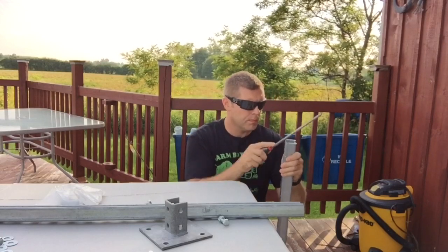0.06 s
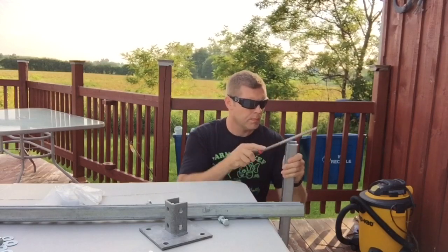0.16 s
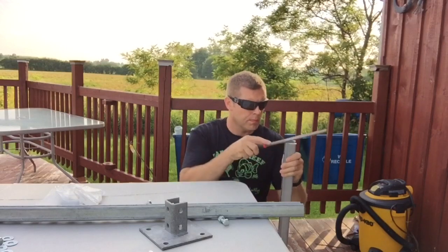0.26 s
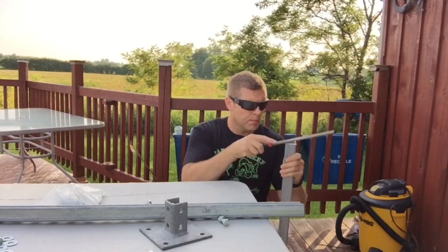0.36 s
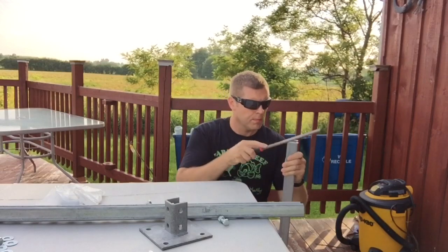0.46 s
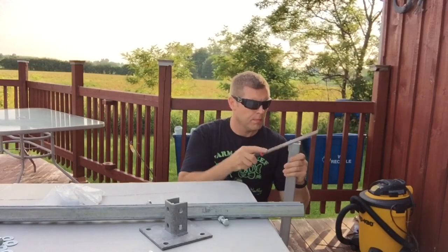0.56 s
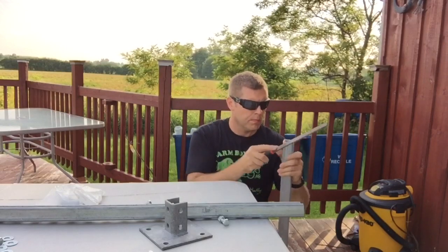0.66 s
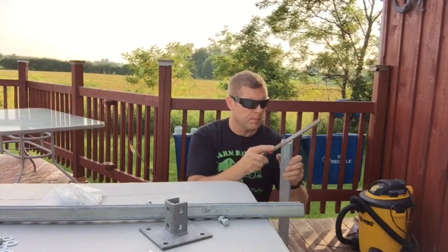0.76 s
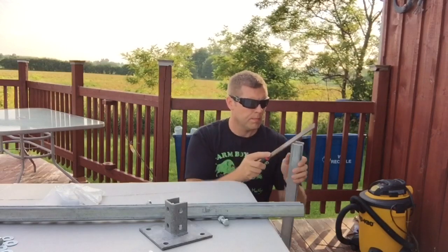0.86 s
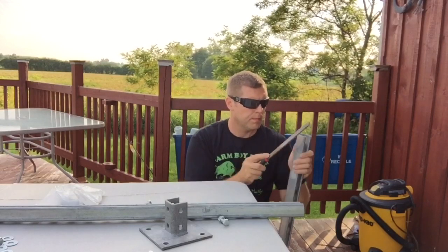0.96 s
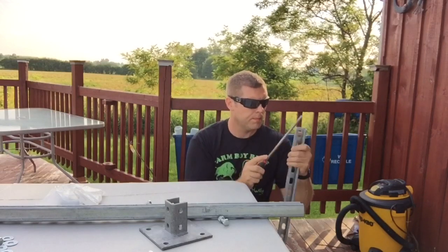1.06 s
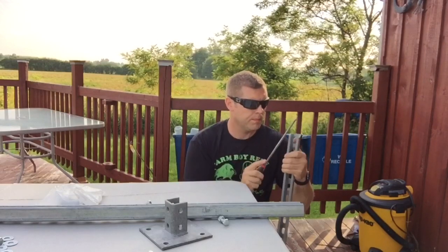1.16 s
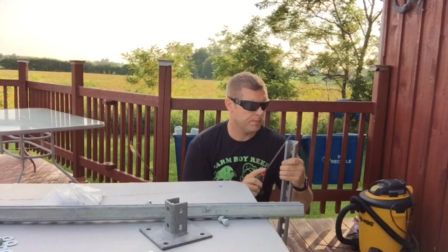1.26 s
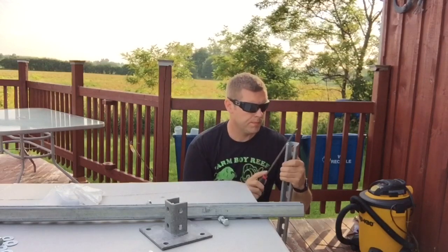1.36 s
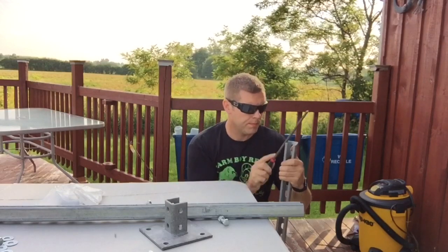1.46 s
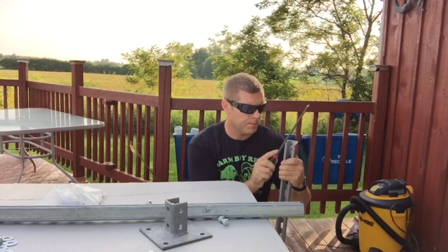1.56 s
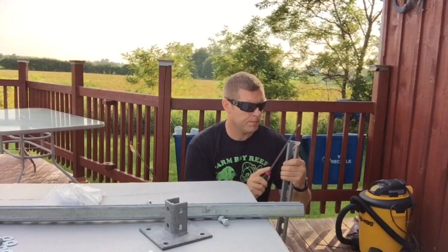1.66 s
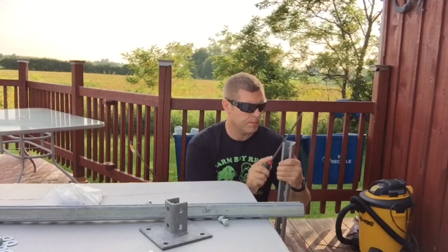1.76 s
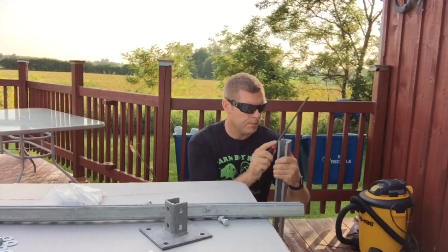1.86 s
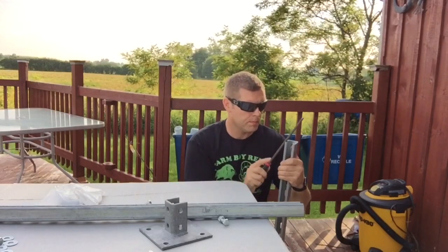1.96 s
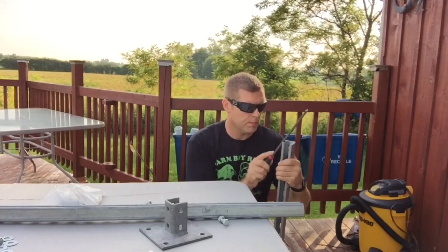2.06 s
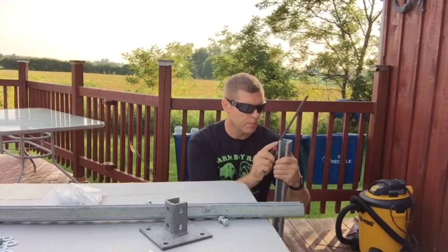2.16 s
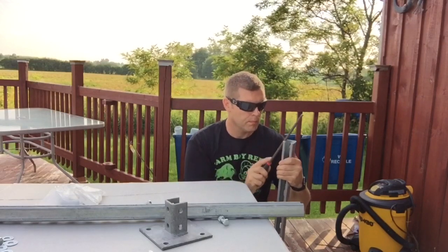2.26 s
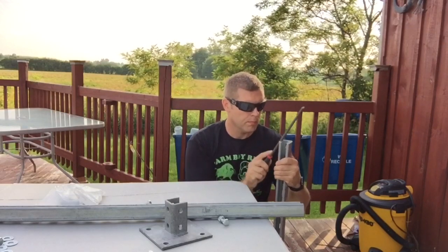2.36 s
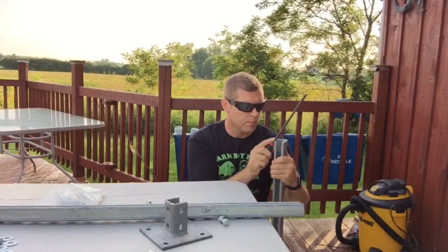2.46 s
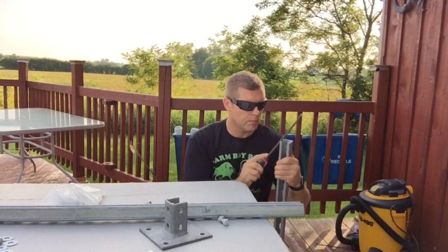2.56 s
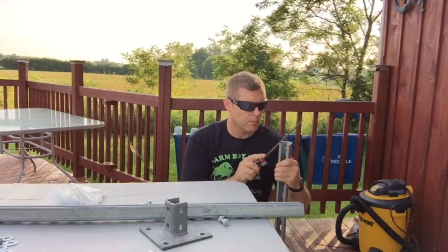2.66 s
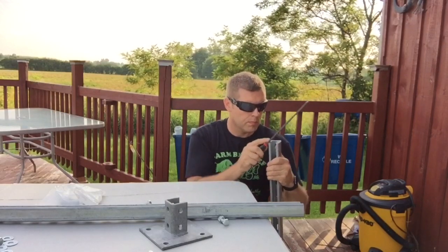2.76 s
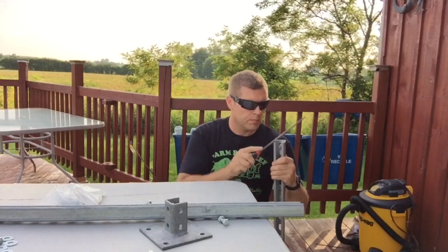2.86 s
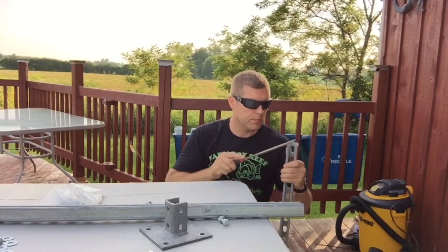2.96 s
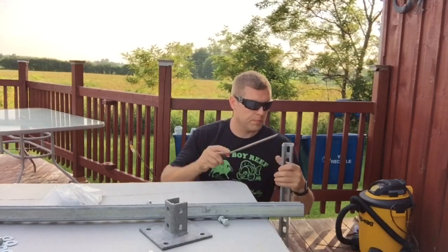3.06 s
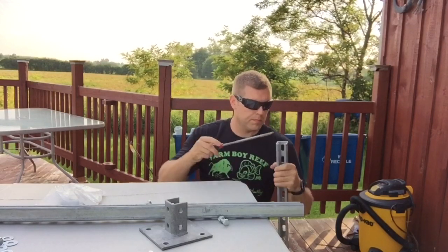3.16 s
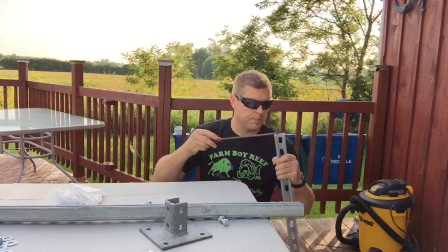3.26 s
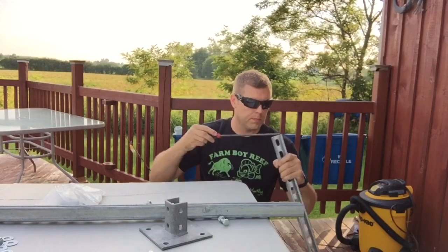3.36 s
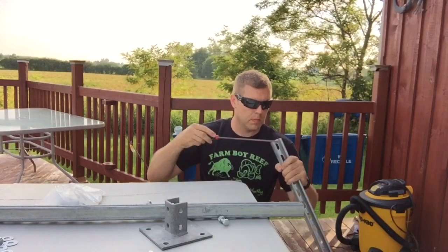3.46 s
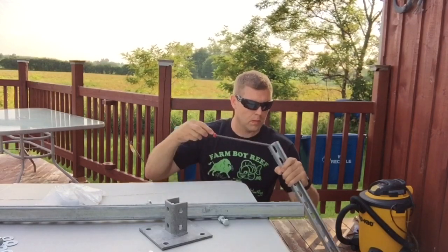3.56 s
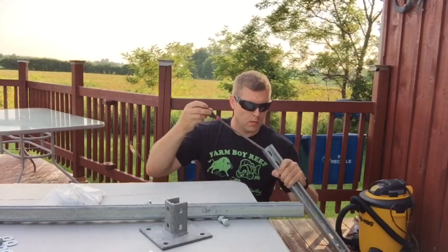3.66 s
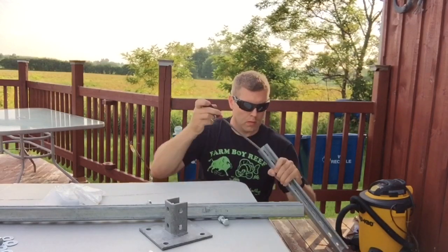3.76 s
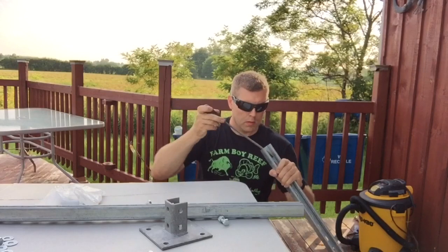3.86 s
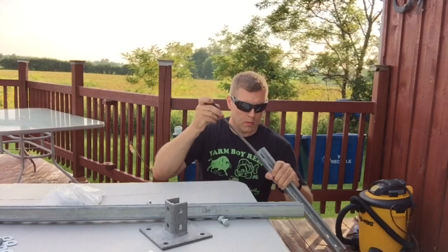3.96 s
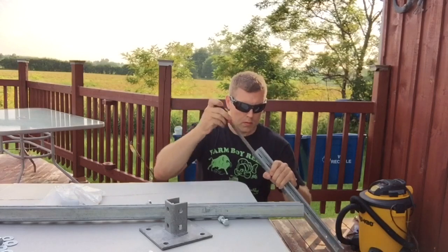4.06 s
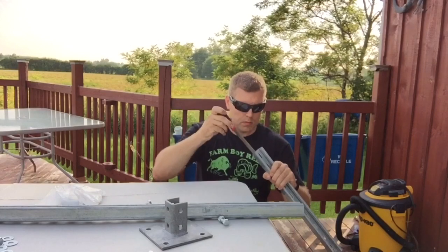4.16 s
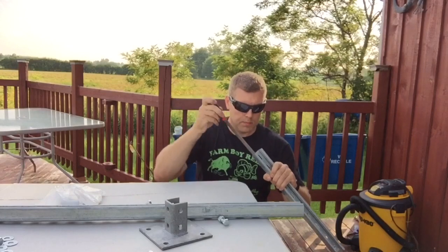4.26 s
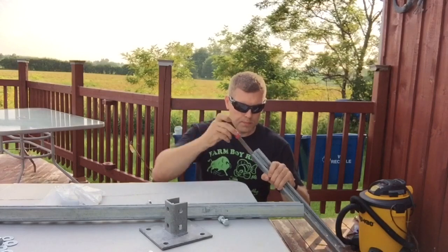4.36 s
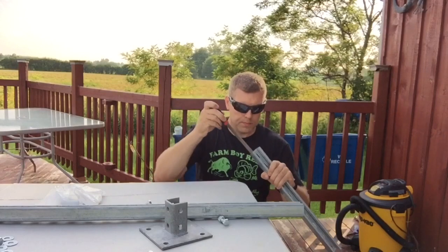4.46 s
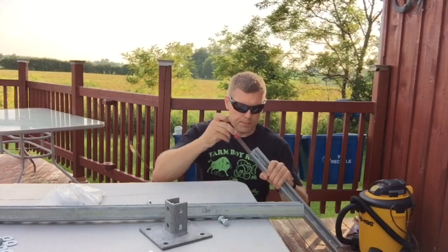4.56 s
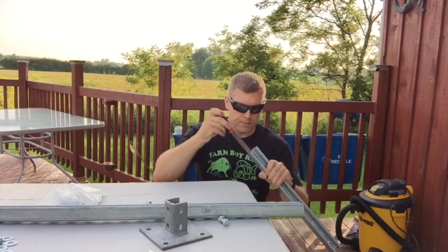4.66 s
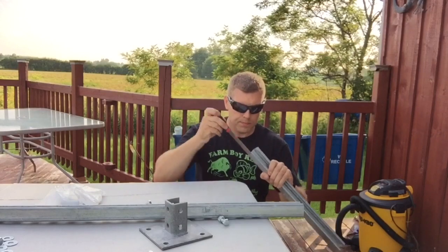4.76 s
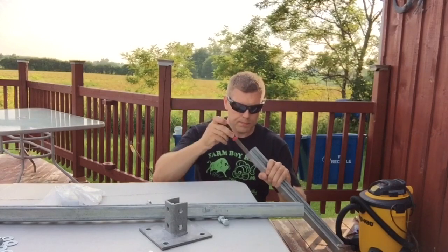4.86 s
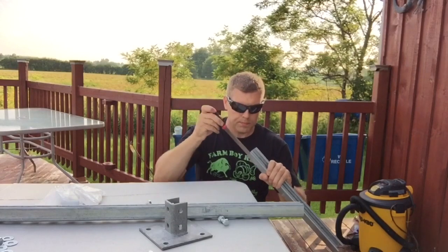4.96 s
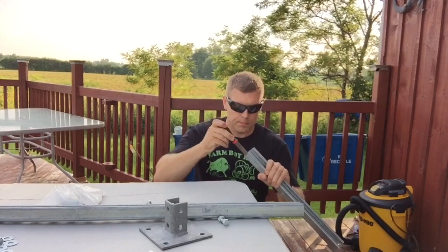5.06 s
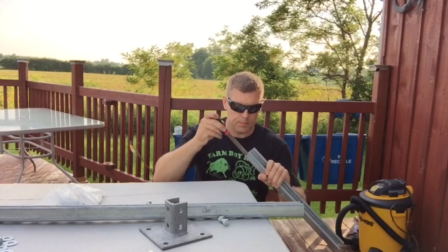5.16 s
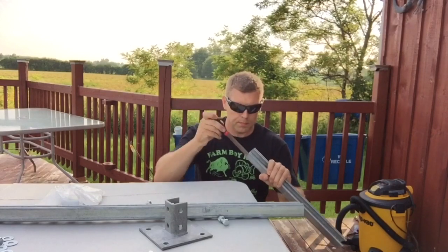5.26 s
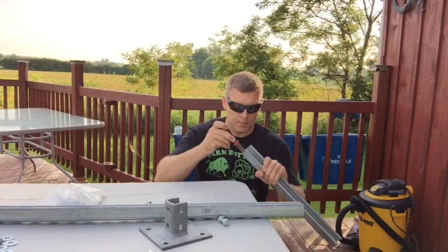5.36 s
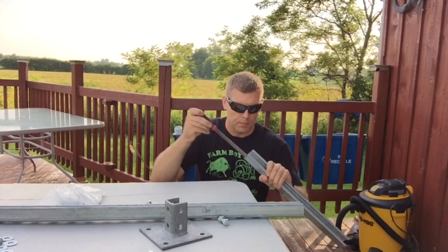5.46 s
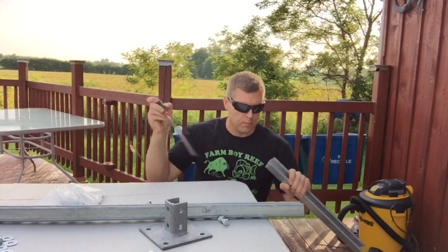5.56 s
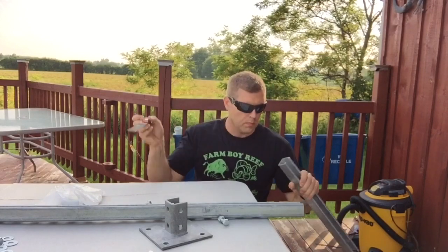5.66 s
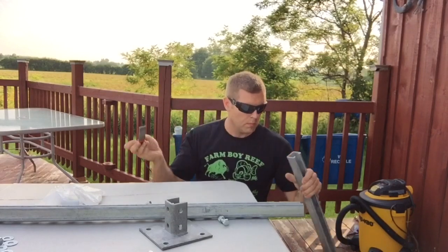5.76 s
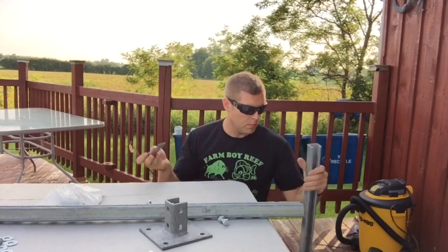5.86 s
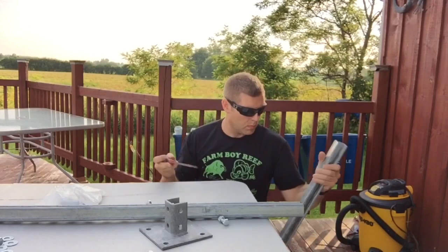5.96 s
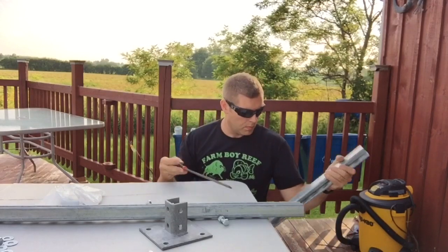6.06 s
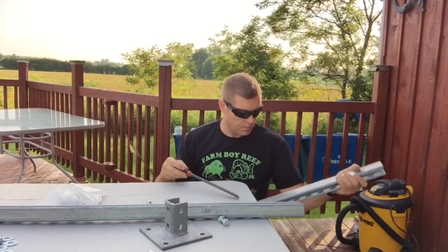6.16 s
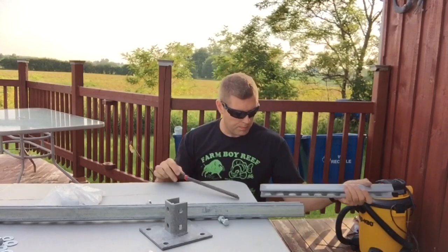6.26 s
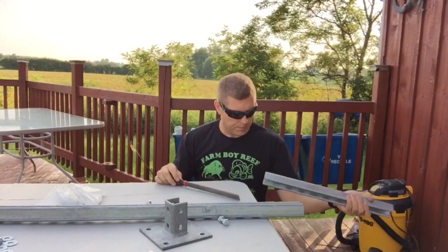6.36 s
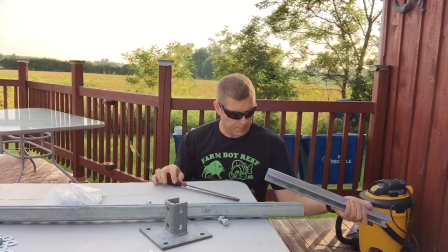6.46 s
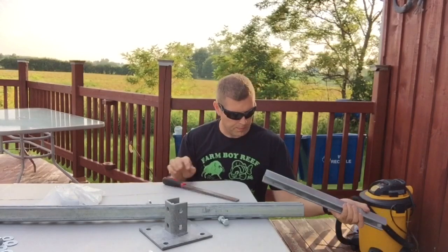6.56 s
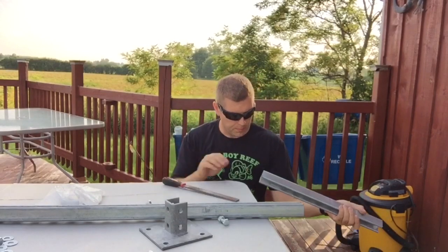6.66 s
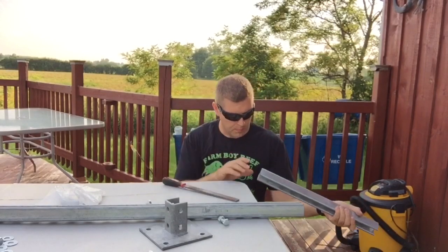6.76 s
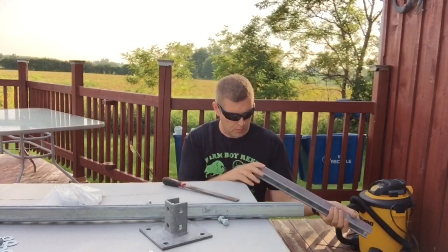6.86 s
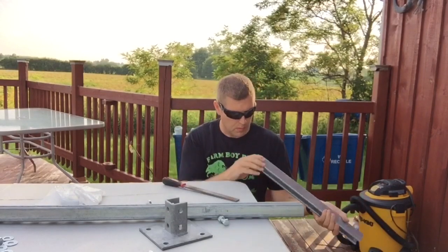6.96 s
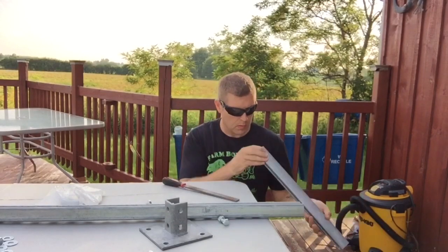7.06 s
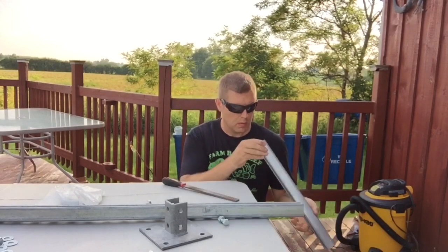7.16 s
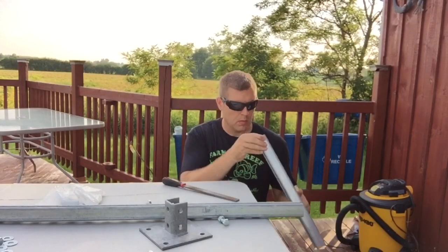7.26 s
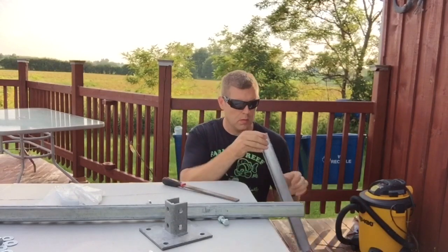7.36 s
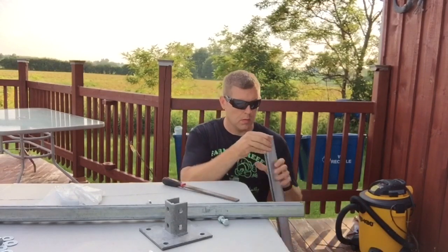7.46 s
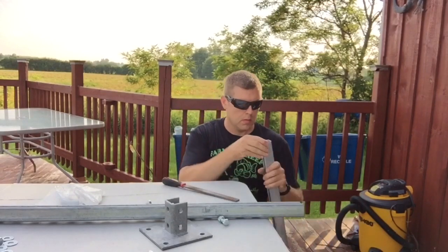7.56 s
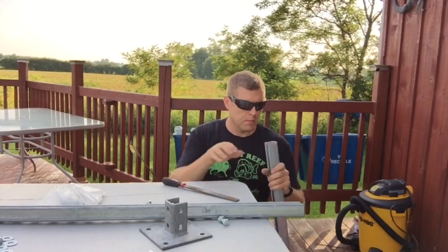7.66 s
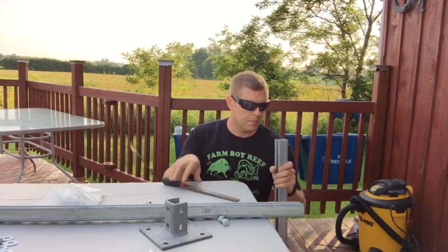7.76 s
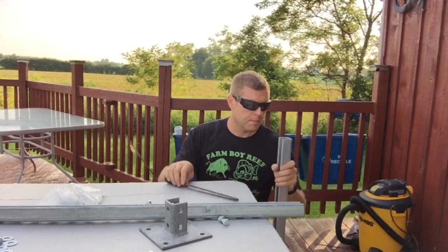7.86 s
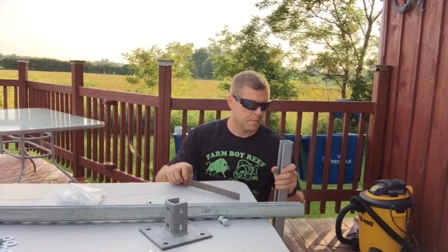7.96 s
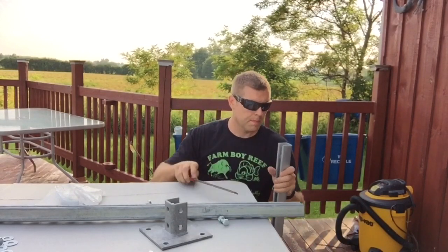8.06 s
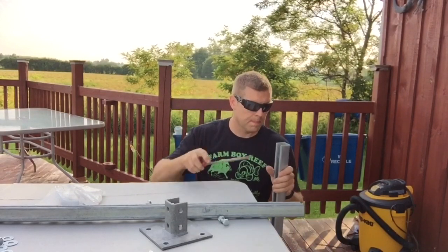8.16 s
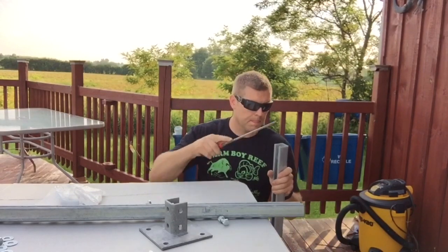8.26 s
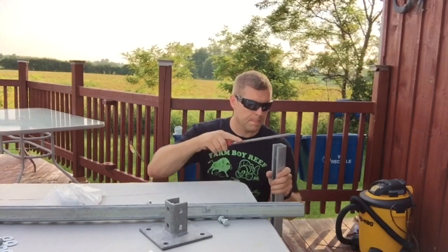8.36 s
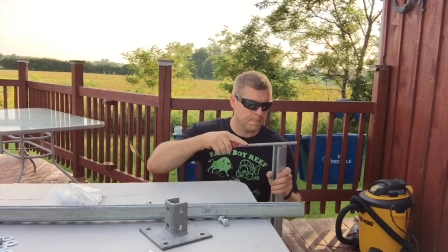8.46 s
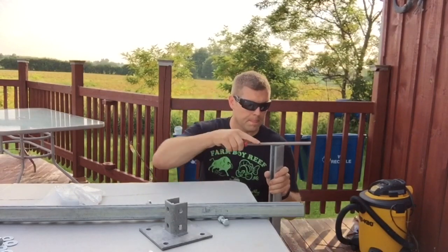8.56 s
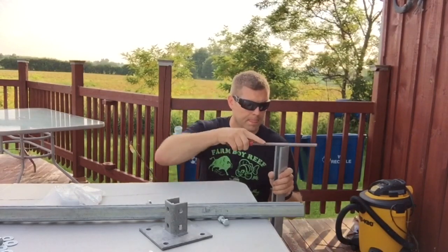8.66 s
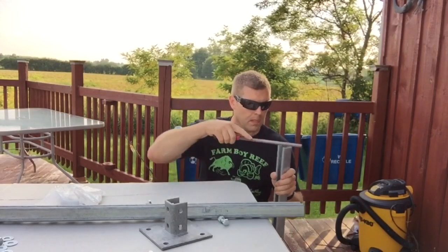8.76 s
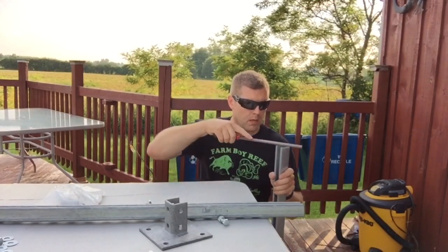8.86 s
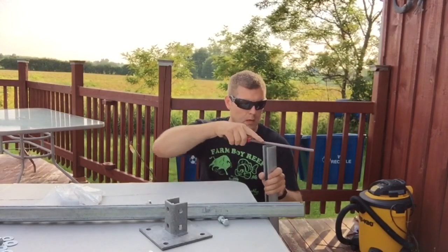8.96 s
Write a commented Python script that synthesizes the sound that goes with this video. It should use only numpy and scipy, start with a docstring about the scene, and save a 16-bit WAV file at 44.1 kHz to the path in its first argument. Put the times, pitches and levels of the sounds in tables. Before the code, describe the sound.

Outdoors on a deck, a hand file scrapes rapidly back and forth over a hollow steel strut in three bouts, with short squeals and gritty catches. The last hard stroke slips off into a bright ring. The file drops on a hollow table with a loud knock, skin rustles, a bird whistles, the file is picked up, and three more rasps follow. Microphone a little way off, faint open air.

```python
"""Bouts of quick rasping strokes with squeals, a steel ring, hollow knocks and a songbird in faint open air.
A hand file deburrs a steel strut on a deck: tooth ticks and chip noise drive the strut's modes.
Sines make the squeals and the free ring. The file is dropped on a hollow plastic table and picked up:
modes and noise bands; its handle groans there in two harmonics. The bird is gliding sines, echoed by trees.
Skin rustles and air are filtered noise."""
import sys
import numpy as np
from scipy import signal
from scipy.fft import rfft, irfft
from scipy.io import wavfile

SR = 44100
rng = np.random.default_rng(int(sys.argv[2]) if len(sys.argv) > 2 else 0)


def master(y):
    """Save y as 16-bit WAV."""
    cut = np.clip(np.atleast_2d(y).T, -1, 1)
    pcm = np.round(cut * 32767)  # scale
    wavfile.write(sys.argv[1], SR, pcm.astype(np.int16))


N = 396900
# samples given to one event, with its time/s and frequency/Hz axes
SIZE = 32768
T, HZ = np.arange(SIZE) / SR, np.arange(SIZE // 2 + 1) * SR / SIZE

# starts of the bouts, each with its own grip on the strut: t/s
BOUT_STARTS_S = [0, 1.2, 3.7, 8.3]


def from_db(db):
    """Amplitude factor of a level in dB."""
    return 10 ** (np.asarray(db) / 20)


def rms_one(x):
    """Scale to an RMS of 1."""
    return x / np.sqrt(np.mean(x ** 2) + 1e-20)


def at_hz(rows, hz, axis=1):
    """One column of a table, joined by straight lines over log frequency."""
    rows = np.array(rows, float)
    return np.interp(np.log(hz + 1e-9), np.log(rows[:, 0]), rows[:, axis])


def add(out, start_s, sound):
    """Mix a sound in at a time, trimmed to the scene."""
    at = round(start_s * SR)
    sound, at = sound[max(0, -at):], max(0, at)
    out[at:at + len(sound)] += sound[:N - at]


def band(x, hz, kind, order=2):
    """Butterworth filter."""
    edges_hz = np.clip(hz, 10, .45 * SR)
    return signal.sosfilt(signal.butter(order, edges_hz, kind, fs=SR, output="sos"), x)


def noise():
    """White noise, one event long."""
    return rng.standard_normal(SIZE)


def drift(rate_hz):
    """Random wander of RMS 1, falling off above rate_hz."""
    return rms_one(irfft(rfft(noise()) / (1 + (HZ / rate_hz) ** 2)))


def arch(length_s):
    """Parabola from 0 up to 1 and back over a length of time."""
    along = np.clip(T / length_s, 0, 1)
    return 1 - (2 * along - 1) ** 2


def ring(modes, spread_db=0):
    """Struck body: decaying sines of alternating sign, mode levels varied at random by spread_db."""
    out = np.zeros(SIZE)
    for k, (hz, db, t60_s) in enumerate(modes):
        decay = from_db(db + spread_db * rng.normal() - 60 * T / t60_s)
        out += (-1) ** k * decay * np.sin(2 * np.pi * hz * T)
    return out


def scatter(t60_s, wet_db):
    """Impulse response: direct sound plus dense, dying reflections."""
    tail = rms_one(noise() * from_db(-60 * T / t60_s)) / np.sqrt(SIZE)
    return (T == 0) + from_db(wet_db) * tail


def air():
    """Steady open-air hiss: noise shaped in frequency."""
    # spectrum: f/Hz, relative level/(dB per Hz)
    spectrum = [(15, -45), (25, -10), (64, -11), (389, -16.5), (469, -17.5), (666, -18), (1080, -23.5),
                (1270, -19), (1660, -22.5), (5140, -26.5), (7500, -27), (15500, -34)]
    level_db = -66.5
    hz = np.arange(N // 2 + 1) * SR / N
    hiss = irfft(rfft(rng.standard_normal(N)) * from_db(at_hz(spectrum, hz)), N)
    return from_db(level_db) * rms_one(band(hiss, 45, "high"))


def bout_at(s):
    """Index of the bout under way."""
    return np.searchsorted(BOUT_STARTS_S, max(s, 0), side="right") - 1


def strut_response(bout):
    """Broad contact colour with the strut's resonances standing out; each grip drives them differently."""
    # broad colour of the rasp: f/Hz, relative level/dB in bouts 1, 2, 3, 4
    rasp = [(150.7, -66.5, -77.5, -62, -35), (294, -40.5, -45, -32, -39), (540, -33.5, -23, -31.5, -10),
            (730, -35, -31, -28, -18), (1324, -27, -14, -8, -20.5), (2200, -17, -25.5, -24, -13.5),
            (3600, -24, -21, -16.5, -18.5), (4940, -29, -18.5, -17.5, -16.5),
            (6560, -33.5, -24, -16.5, -15.5), (9893, -34, -28.5, -28, -24.5),
            (15000, -40, -37.5, -33.5, -32)]
    # strut modes: f/Hz, width/Hz, lift/dB in bouts 1, 2, 3, 4
    strut_modes = [(500, 41, 11.5, 4.5, 3, 3), (1011, 35, 23, 4.5, -4.5, -18),
                   (1097, 37, 5.5, 5.5, -6, 18.5), (1446, 35, 17, 16.5, -1.5, 17),
                   (1678, 53, 9, -0.5, 4, 13.5), (2092.6, 44.8, 17, 20, 21.5, 21),
                   (2306, 76.5, -13.5, 10.5, 14, 8.5), (2492, 32, 18.5, 6.5, 11.5, 6),
                   (2775, 71, 7, 16, 11.5, 18.5), (3124, 110, 6.5, 10, 8, 12),
                   (3465, 34, 5.5, 6.5, 10.5, 14.5), (3766, 36, 9, 10.5, 3.5, 19.5),
                   (4225, 57, 7, 10, 6.5, 7), (4368, 72, 13, 0, 10.5, 15), (4582, 17, 16.5, 16, 10.5, 16),
                   (5412, 47, 23, 12, 12, 12), (5920, 150, 6.5, 10, 4, 11), (6188, 70, 13.5, 8, 13.5, -10),
                   (6467, 76, 8.5, 10, -5, 10), (6705, 51, 17.5, 10.5, 11, 3),
                   (7290, 110, 11.5, 11.5, 6.5, 5), (7727, 61, 11, 9.5, 3, 15), (8260, 42, 16, 2, 1, 8)]
    response = from_db(at_hz(rasp, HZ, axis=1 + bout))
    for hz, width_hz, *lift_db in strut_modes:
        detune = 2j * (HZ - hz) / width_hz
        response = response * (from_db(lift_db[bout]) + detune) / (1 + detune)
    return response


def push(along, peak_db, peak_at, light_db):
    """Hand force: rises in dB to one peak and eases off, fading where the file turns round."""
    least_swell_db, turning_db = 5.5, -24
    grip_share, release_share = .13, .11  # of the stroke
    # light_db: force half a stroke away from the peak
    swell_db = max(peak_db - light_db, least_swell_db)
    hold = np.minimum(along / grip_share, (1 - along) / release_share)
    moving = np.clip(hold ** 2, from_db(turning_db), 1) * (along < 1)
    return moving * from_db(peak_db - swell_db * 2 * np.abs(along - peak_at))


def stroke(along, force, teeth_hz, bite_db, contact, response,
           speed_treble_db=6.5, slow_grind_db=17.0, chatter_hz=300):
    """Teeth tick over the edge, faster in mid stroke, amid crunching chips; both drive the strut."""
    grit_db, uneven, chatter_db, chip_db = contact
    speed = (.25 + .75 * np.sin(np.pi * along)) * (1 + .04 * drift(25))
    passed = np.cumsum(teeth_hz * speed * (1 + uneven * drift(700))) / SR
    ticks = np.diff(np.floor(passed), prepend=0)
    teeth = rms_one(band(ticks, 200, "high") / np.sqrt(speed))
    # several teeth share the edge, which rounds each tick; breaking chips stay sharp
    teeth = band(teeth, 2600, "low")
    chip_sizes = np.minimum(rng.exponential(1, SIZE), 6)
    chips = rms_one(noise() * from_db(chip_db * chip_sizes))
    drive = (teeth + from_db(grit_db) * chips) * from_db(chatter_db * drift(chatter_hz))
    # a fast file cuts brighter, a slow one grinds lower
    high = band(drive, 3500, "high", order=1)
    rest = drive - high
    low, middle = band(rest, 950, "low"), band(rest, 950, "high")
    haste = speed - .8
    low = -low * from_db(-slow_grind_db * haste)
    high = high * from_db(speed_treble_db * haste + bite_db)
    drive = low + middle + high
    smear = rfft(scatter(t60_s=.045, wet_db=-3))
    sound = irfft(rfft(drive * force) * response * smear)
    return rms_one(sound) * np.sqrt(np.mean(force ** 2))


def squeal(hz, peak_db, half_s):
    """Teeth lock onto a mode of strut or file: a wavering sine swelling to a peak at 4 half_s."""
    swell = np.exp(-np.abs((T - 4 * half_s) / half_s) ** 1.6)
    phase = 2 * np.pi * np.cumsum(hz * (1 + .008 * drift(150))) / SR
    return from_db(peak_db) * swell * np.sin(phase)


def filing(responses):
    """File strokes through the strut, and momentary squeals."""
    # strokes: start t/s, end t/s, peak force level/dB, peak place along the stroke/0-1,
    # tooth rate at full speed/Hz, bite (extra treble) level/dB
    strokes = [(-0.05, 0.117, -22, 0.51, 2500, -4.5), (0.124, 0.259, -32.5, 0.45, 1960, -0.5),
               (0.273, 0.429, -20.5, 0.55, 2270, 5), (0.455, 0.613, -26.5, 0.49, 2502, 5.5),
               (0.637, 0.728, -28, 0.38, 2095, -1.5), (1.329, 1.474, -42.5, 1, 810, -7.5),
               (1.436, 1.627, -23.5, 0.72, 3060, 1), (1.634, 1.784, -20.5, 0.56, 2180, 11.5),
               (1.786, 1.951, -15.5, 0.51, 2805, 6.5), (1.951, 2.093, -22, 0.35, 2540, 2.5),
               (2.089, 2.236, -24, 0.49, 2320, 6), (2.234, 2.387, -28.5, 0.52, 1530, 3),
               (2.394, 2.542, -19.5, 0.87, 2812, 5.5), (2.554, 2.705, -20.5, 0.37, 2300, 4),
               (2.71, 2.866, -16.0, 0.62, 2460, 13.5), (2.891, 3.046, -26, 0.31, 3000, 18),
               (3.834, 3.967, -31, 0.89, 1600, -17.5), (3.972, 4.142, -33.5, 0.44, 1365, -21),
               (4.13, 4.249, -21.5, 0.84, 1980, 5), (4.26, 4.389, -27, 0.24, 1360, 5),
               (4.386, 4.531, -23.5, 0.27, 2130, 16), (4.51, 4.622, -16, 0.44, 1930, -8),
               (4.596, 4.712, -20.5, 0.63, 2000, 10), (4.716, 4.869, -17.0, 0.41, 1500, -1),
               (4.852, 4.968, -23.5, 0.29, 2340, 0.5), (4.96, 5.083, -14.5, 0.61, 1530, 4.5),
               (5.073, 5.207, -31.0, 0.48, 1480, 6), (5.218, 5.341, -22, 0.25, 2470, 7.5),
               (5.355, 5.464, -25, 0.66, 1650, 8.5), (5.464, 5.644, -9, 0.65, 2430, 14.5),
               (8.519, 8.701, -18, 0.67, 2300, -5), (8.787, 8.936, -22.5, 0.37, 1940, 2),
               (8.914, 9.03, -14.5, 0.91, 2000, 4.5)]
    # contact by bout: grit against teeth/dB, unevenness of tooth spacing/0-1,
    # chatter/dB, spread of chip sizes/dB
    contacts = [(0, .10, 1.5, 1), (-2.8, .062, 1.9, 2), (1, .2, 3, 3.5), (0, .1, 1.5, 1.5)]
    # light gliding force by bout, half a stroke from the peak: level/dB
    light_touch_db = [-30, -27.5, -33.5, -37.5]
    # squeals: peak t/s, f/Hz, peak level/dB, half length/s
    squeals = [(.085, 2503, -16, 0.012), (1.823, 1480, -23.5, 0.0054), (1.885, 1432, -6.5, 0.0057),
               (2.517, 2775, -18, 0.01), (2.592, 1434, -12.5, 0.0067), (2.643, 3790, -18.5, .017),
               (2.95, 2790, -19, .0052), (4.209, 6420, -15.5, 0.0037), (4.346, 1001, -30, 0.0255),
               (5.585, 2126, -2.5, 0.0051), (5.598, 2157, -9, .0048), (5.613, 5950, -10.5, 0.0061),
               (8.837, 2066, -12, .011)]
    out = np.zeros(N)
    for start_s, end_s, peak_db, peak_at, teeth_hz, bite_db in strokes:
        bout = bout_at(start_s)
        along = np.clip(T / (end_s - start_s), 0, 1)
        force = push(along, peak_db, peak_at, light_touch_db[bout])
        add(out, start_s, stroke(along, force, teeth_hz, bite_db, contacts[bout], responses[bout]))
    for peak_s, hz, peak_db, half_s in squeals:
        add(out, peak_s - 4 * half_s, squeal(hz, peak_db, half_s))
    return out


def rustles(grain_db=2.5):
    """Hands shift on steel and table: skin slides in small uneven slips of band noise."""
    # slides: middle t/s, level/dB, half length/s, upper edge f/Hz
    slides = [(0.772, -64.5, 0.044, 6000), (3.171, -63.5, 0.042, 12100), (3.728, -56.5, 0.039, 1550),
              (6.439, -55.5, 0.094, 2310), (6.564, -55, 0.044, 4940), (6.987, -62, .03, 8950),
              (7.248, -65, 0.13, 3004), (7.652, -62.5, 0.12, 5000)]
    out = np.zeros(N)
    for middle_s, db, half_s, top_hz in slides:
        slips = band(noise(), [250, top_hz], "band", order=1) * from_db(grain_db * drift(90))
        swell = np.exp(-((T - 3 * half_s) / half_s) ** 2)
        add(out, middle_s - 3 * half_s, from_db(db) * rms_one(slips) * swell)
    return out


def birds(warble=.015, second_voice_db=-17, flutter_db=2.5, echo_t60_s=.28, echo_db=-4):
    """Arching whistles with a quick warble, smeared by echoes from the trees."""
    # notes: start t/s, length/s, first and last f of the straight glide/Hz, level/dB
    notes = [(.83, 0.048, 7530, 7300, -58), (1.284, 0.042, 4240, 4060, -52),
             (3.095, 0.09, 2220, 2200, -37.5), (3.172, 0.084, 2733, 2585, -41),
             (3.581, 0.094, 2307, 2274, -39.5), (3.628, 0.043, 3160, 2620, -46.5),
             (3.664, 0.051, 2200, 2000, -40), (3.724, 0.077, 2000, 2030, -38.5),
             (3.858, 0.043, 2270, 2350, -39), (5.776, 0.046, 3070, 2150, -43.5),
             (5.82, 0.083, 1943, 1967, -45), (5.93, 0.14, 2366, 2320, -45.5),
             (6.606, 0.08, 2506, 2643, -37), (6.691, .06, 3230, 3060, -39.5),
             (6.738, .085, 2347, 2450, -40), (7.204, 0.11, 2160, 2220, -38),
             (7.347, 0.066, 2043, 2280, -36.5), (7.719, 0.078, 2920, 2996, -38),
             (7.778, 0.036, 2950, 2450, -37), (7.821, 0.064, 2563, 2526, -38.5),
             (7.951, 0.044, 2680, 2650, -38), (7.996, 0.071, 2300, 2110, -37.5)]
    # the arch above the glide is higher in longer notes
    arch_hz_per_s, note_fade_db = 2200, 5.5
    out = np.zeros(N)
    for start_s, length_s, first_hz, last_hz, db in notes:
        bow = arch(length_s)
        hz = np.interp(T, [0, length_s], [first_hz, last_hz]) + arch_hz_per_s * length_s * bow
        phase = 2 * np.pi * np.cumsum(hz * (1 + warble * drift(120))) / SR
        # the other side of the syrinx adds a faint, hoarse voice a little higher
        second_voice = from_db(second_voice_db) * drift(200) * np.sin(1.12 * phase)
        gate = np.clip(np.minimum(T, length_s - T) / .005, 0, 1)
        level_db = db - note_fade_db * (1 - bow) + flutter_db * drift(60)
        add(out, start_s, gate * (np.sin(phase) + second_voice) * from_db(level_db))
    return signal.fftconvolve(out, scatter(echo_t60_s, echo_db))[:N]


def taps(responses, crunch_t60_s=.07, file_db=-16):
    """File touches or catches: noise crunch into the strut, file ringing in the hand; later a free ring."""
    # touches: t/s, crunch peak level/dB
    touches = [(1.337, -43), (3.439, -27), (3.515, -16), (3.912, -18), (3.926, -17.5), (4.205, -10.5),
               (4.334, -16.5), (4.441, -12), (4.68, -18), (4.732, -9.5), (4.887, -8), (4.991, -14),
               (5.118, -15.5), (5.235, -27), (6.041, -47), (8.531, -11.5)]
    # modes of the file: f/Hz, relative level/dB, t60/s
    file_modes = [(1001, -6.5, 0.18), (2150, 1, .18), (2560, -8, 0.09), (4400, -8, .18),
                  (6340, -52.5, 0.14)]
    # steel ringing free, with a beating pair on top: f/Hz, relative level/dB, t60/s
    free_modes = [(1001, -9, 0.21), (2153, -14.5, 0.32), (3040, -14.5, 0.62), (5389, -21, .4),
                  (6282, -3.5, 0.57), (6300, -7, 0.58), (7386, -30.5, 0.29)]
    slip_off_s, free_ring_db = 5.615, -25.5
    out = np.zeros(N)
    for s, db in touches:
        burst = noise() * from_db(-60 * T / crunch_t60_s)
        crunch = irfft(rfft(burst) * responses[bout_at(s)])
        crunch = crunch * (T < T[-1] / 2)  # drops FFT wrap-around
        add(out, s, from_db(db) * (crunch / np.abs(crunch).max() + from_db(file_db) * ring(file_modes)))
    add(out, slip_off_s, from_db(free_ring_db) * ring(free_modes))
    return out


def table(clatter_db=4.5):
    """Blows on the hollow top: low modes and clatter, duller for a softer contact."""
    # knocks: t/s, level/dB, contact hardness as low-pass f/Hz
    knocks = [(6.229, -5.5, 3500), (6.262, -32, 1400), (6.305, -41, 1300), (6.62, -17, 1580),
              (6.671, -23, 410), (7.41, -54, 23), (7.714, -45.5, 20.4), (7.909, -39.5, 3100),
              (7.946, -24.5, 3000), (8.005, -29, 100), (8.048, -41, 380), (8.885, -36, 30)]
    # modes of the top: f/Hz, relative level/dB, t60/s
    top_modes = [(52, -17.5, .4), (86.1, -9.5, 0.51), (104.8, -17.5, 0.18), (154.8, -2, 0.32),
                 (244.7, -3, 0.18), (280, 4.5, 0.15), (500, -29.5, 0.065), (598, -4, 0.27),
                 (745, -1.5, 0.119), (980, -18.5, .15), (1200, -24.5, 0.1), (1410, -12, 0.158),
                 (1654, -4, 0.17)]
    # dense upper modes and loose parts: f/Hz, relative level/(dB per Hz), t60/s
    clatter_bands = [(59, -6.5, 0.73), (246, 2.5, 0.34), (696, 0.5, 0.21), (2000, -3, 0.26),
                     (3950, -10, 0.18), (8000, -18.5, 0.19), (15000, -23.5, 0.26)]
    out, edges_hz = np.zeros(N), np.geomspace(40, 16000, num=13)
    for s, db, hard_hz in knocks:
        clatter = np.zeros(SIZE)
        for low_hz, high_hz in zip(edges_hz, edges_hz[1:]):
            hz = np.sqrt(low_hz * high_hz)
            t60_s = at_hz(clatter_bands, hz, axis=2)
            decay = from_db(at_hz(clatter_bands, hz) - 60 * T / t60_s)
            clatter += band(noise(), [low_hz, high_hz], "band") * decay
        blow = rms_one(ring(top_modes, spread_db=1.5)) + from_db(clatter_db) * rms_one(clatter)
        blow = band(blow, hard_hz, "low", order=1)
        blow = band(blow, 4 * hard_hz, "low")
        # level refers to 3 x the RMS of the first 30 ms
        add(out, s, from_db(db) * blow / (3 * blow[T < .03].std()))
    return out


def handle_rub(judder_db=3.5):
    """Handle rubs on the table: stick and slip give a short two-harmonic groan sinking in pitch."""
    start_s, length_s, level_db = 6.36, .13, -31
    start_hz, sag_hz_per_s = 289, 393
    out = np.zeros(N)
    hz = start_hz - sag_hz_per_s * np.minimum(T, length_s)
    phase = 2 * np.pi * np.cumsum(hz * (1 + .05 * drift(80))) / SR
    groan = np.sin(phase) + .1 * np.sin(2 * phase)
    add(out, start_s, arch(length_s) * from_db(level_db + judder_db * drift(30)) * groan)
    return out


def scene():
    """Work sounds with the deck's tail, plus bird and air."""
    responses = [strut_response(bout) for bout in range(len(BOUT_STARTS_S))]
    work = filing(responses) + rustles() + taps(responses) + table() + handle_rub()
    # wall, railing and boards of the deck return a faint tail
    deck = signal.fftconvolve(work, scatter(t60_s=.32, wet_db=-15.5))[:N]
    return (air() + deck + birds())[None]


def record(dry):
    """Clip peaks at full scale, then cut the top with a steep low-pass."""
    cutoff_hz = 15700
    low_pass = signal.ellip(10, .2, 80, cutoff_hz, fs=SR, output="sos")
    return signal.sosfilt(low_pass, np.clip(dry, -1, 1))


dry = scene()
out = record(dry)
master(out)
```